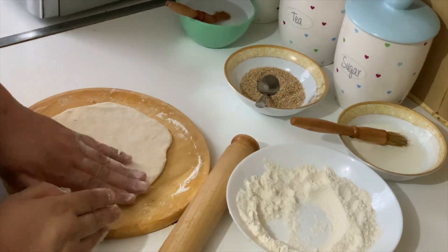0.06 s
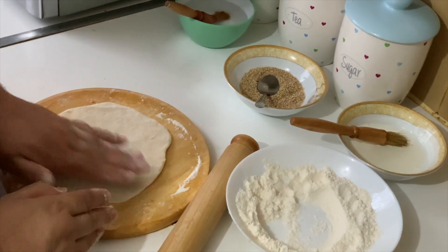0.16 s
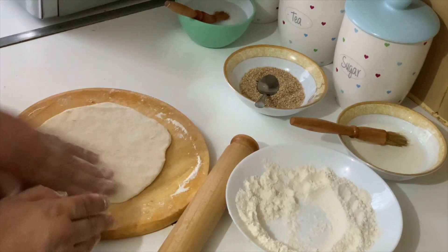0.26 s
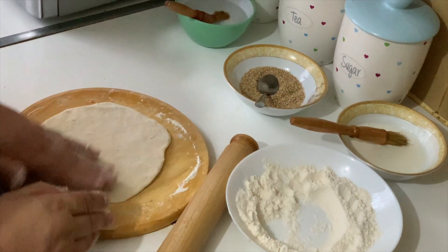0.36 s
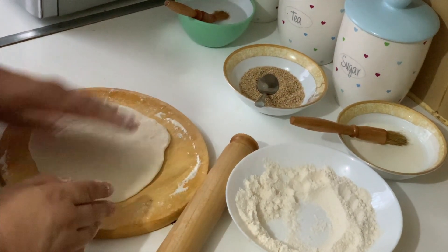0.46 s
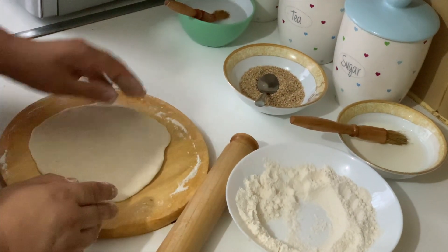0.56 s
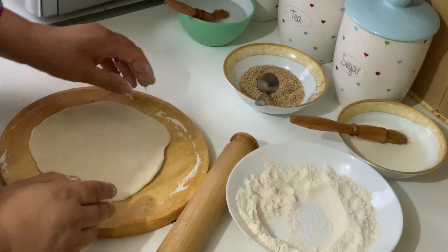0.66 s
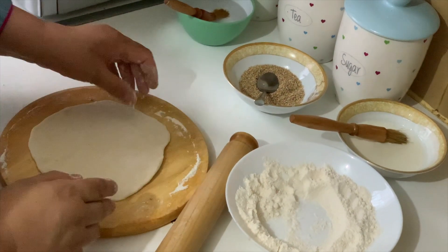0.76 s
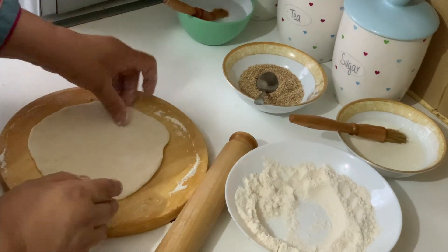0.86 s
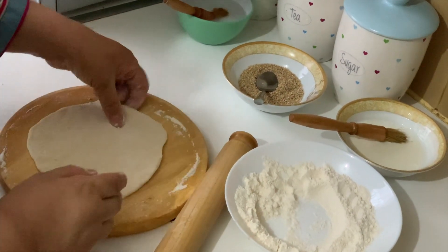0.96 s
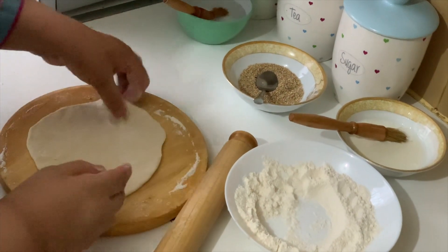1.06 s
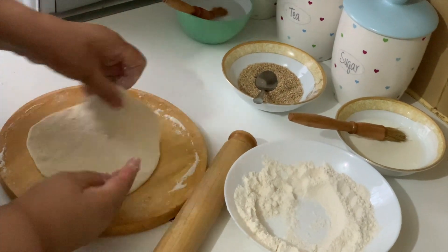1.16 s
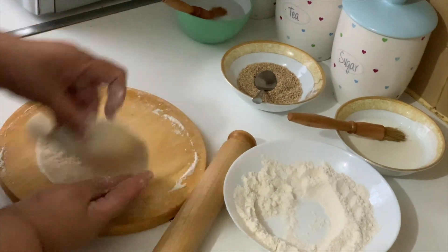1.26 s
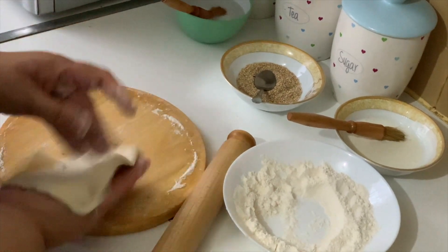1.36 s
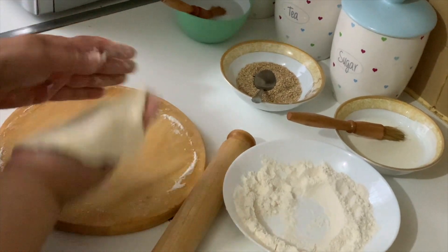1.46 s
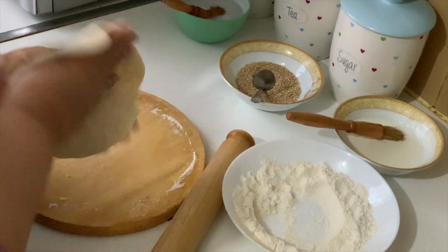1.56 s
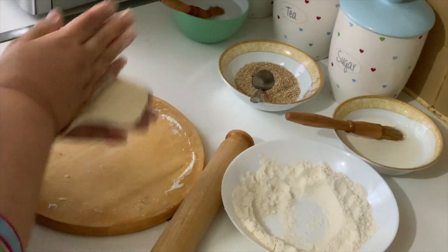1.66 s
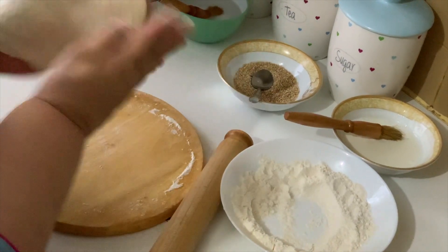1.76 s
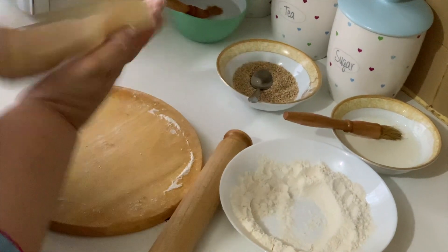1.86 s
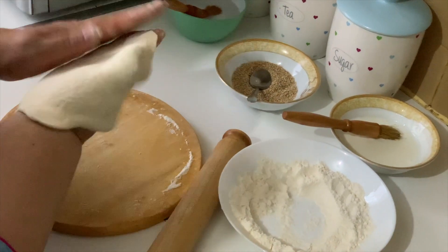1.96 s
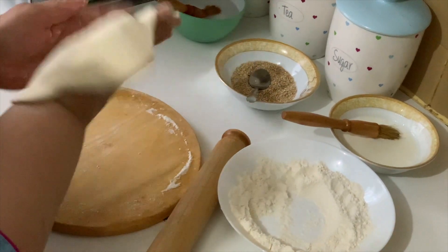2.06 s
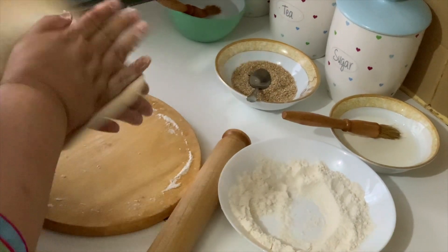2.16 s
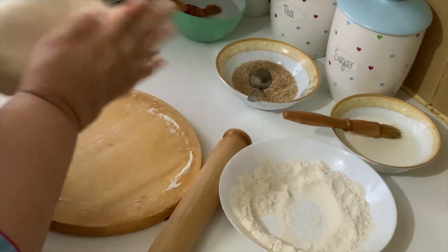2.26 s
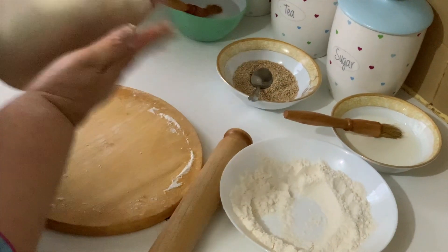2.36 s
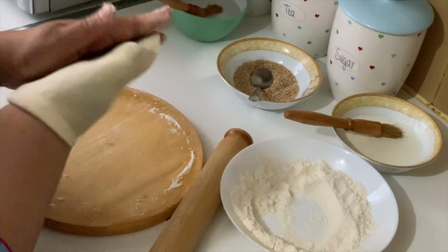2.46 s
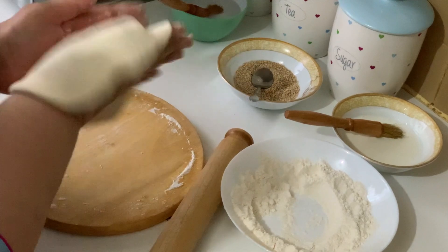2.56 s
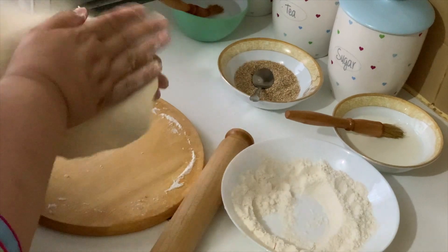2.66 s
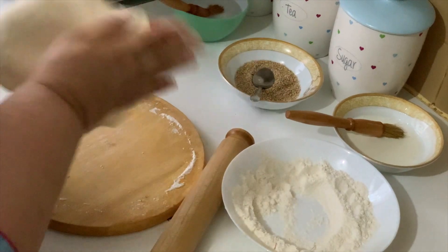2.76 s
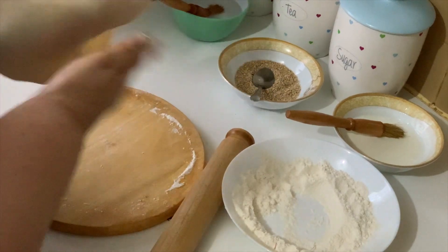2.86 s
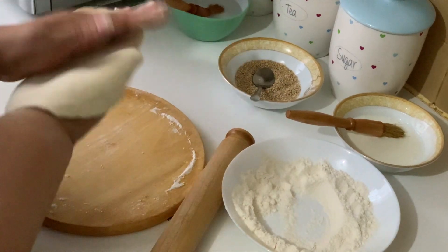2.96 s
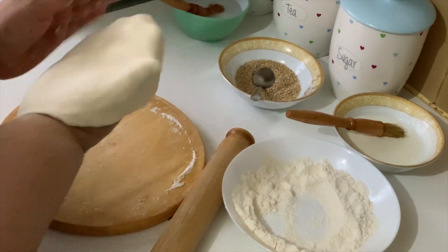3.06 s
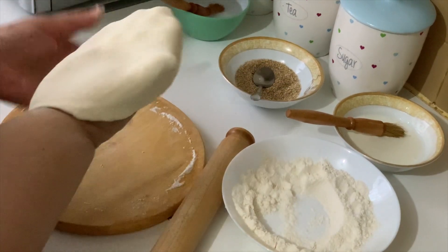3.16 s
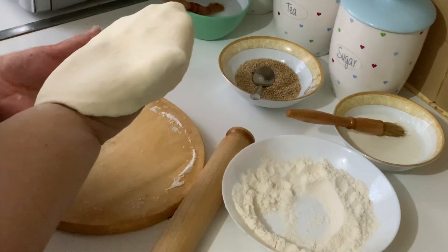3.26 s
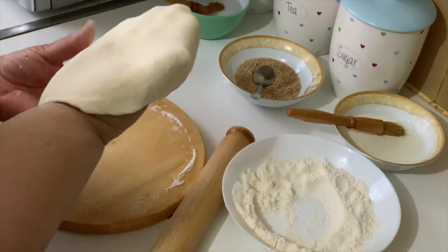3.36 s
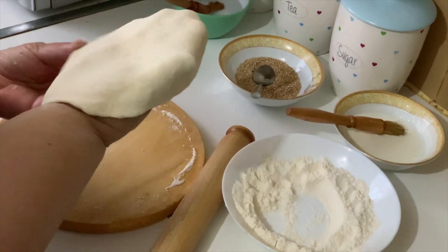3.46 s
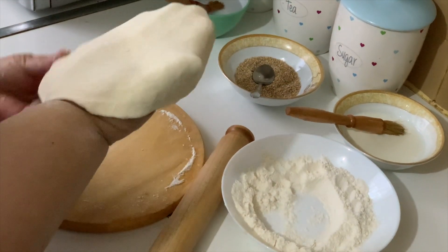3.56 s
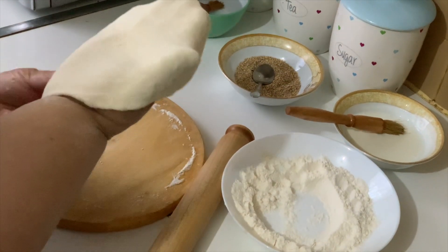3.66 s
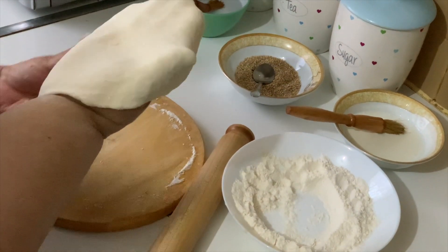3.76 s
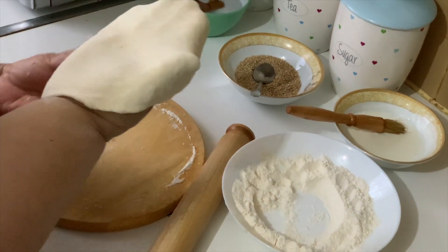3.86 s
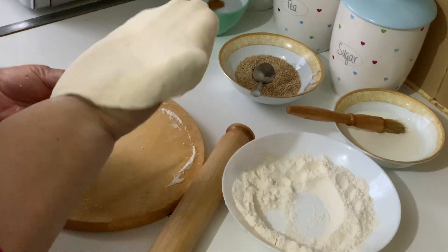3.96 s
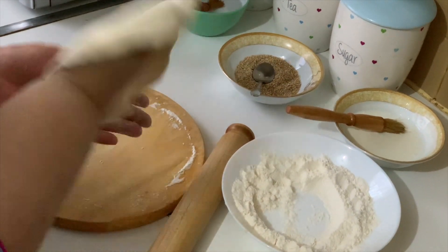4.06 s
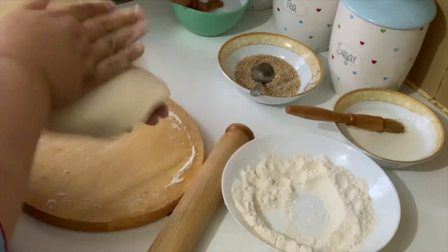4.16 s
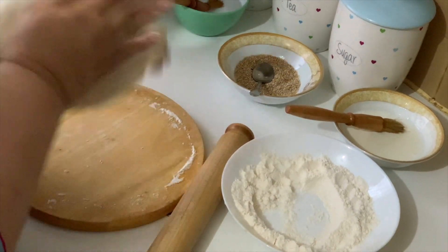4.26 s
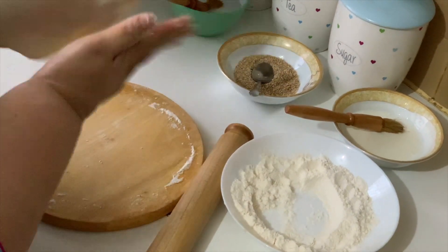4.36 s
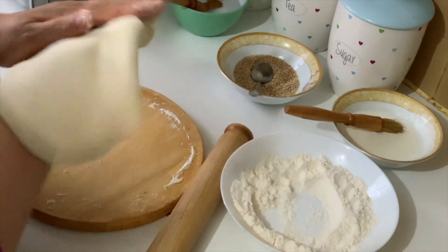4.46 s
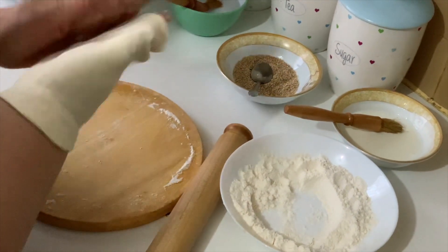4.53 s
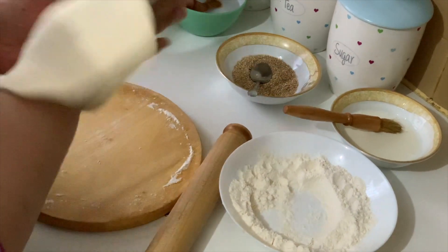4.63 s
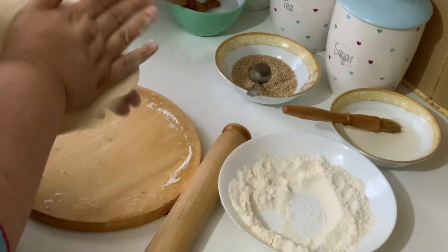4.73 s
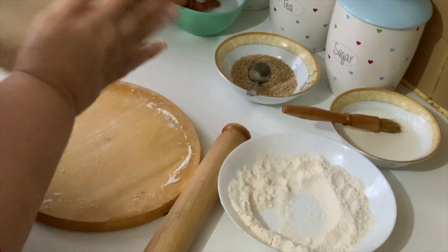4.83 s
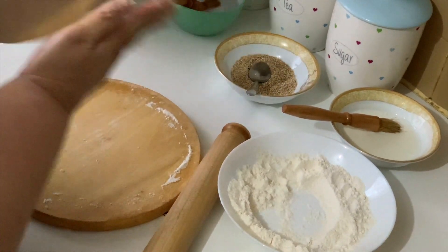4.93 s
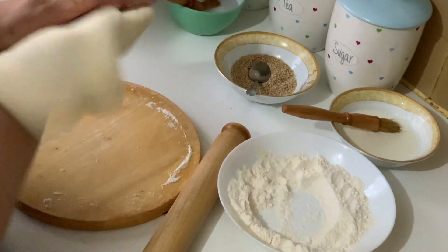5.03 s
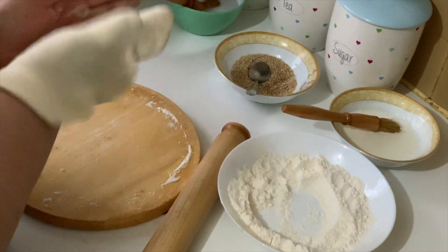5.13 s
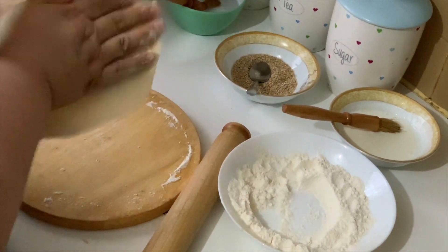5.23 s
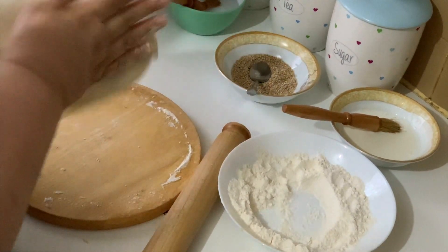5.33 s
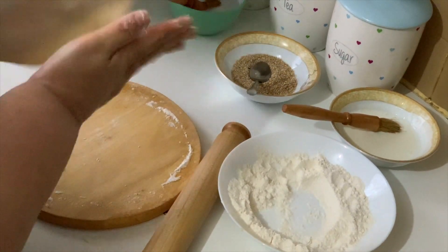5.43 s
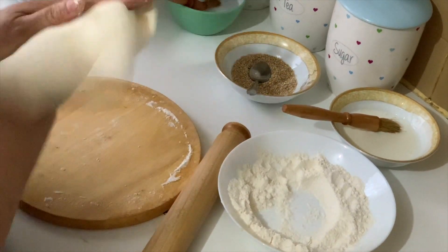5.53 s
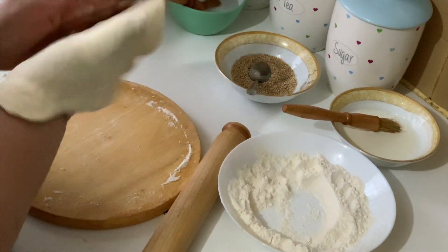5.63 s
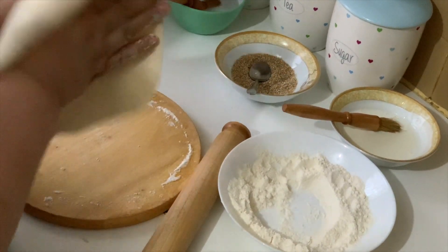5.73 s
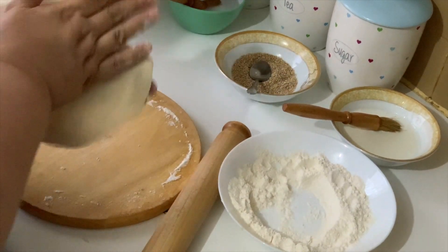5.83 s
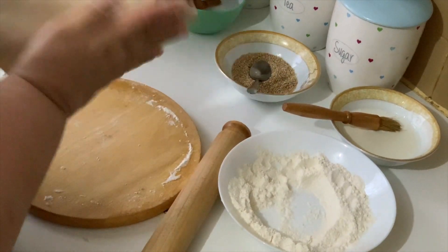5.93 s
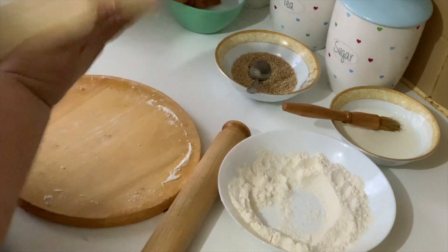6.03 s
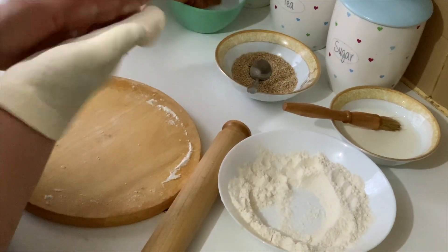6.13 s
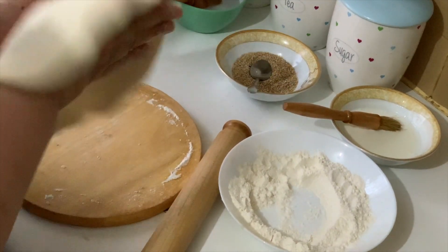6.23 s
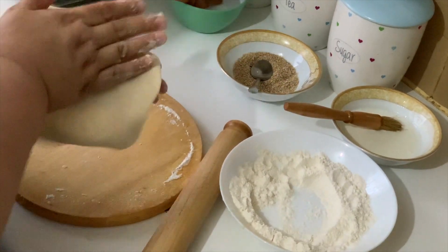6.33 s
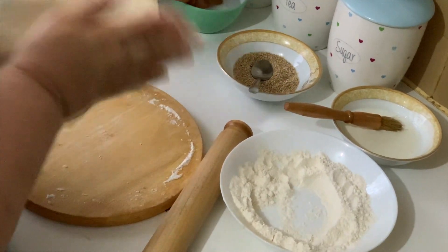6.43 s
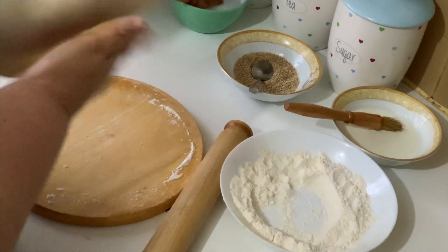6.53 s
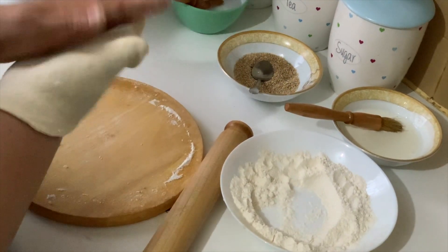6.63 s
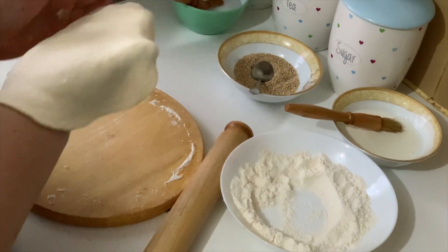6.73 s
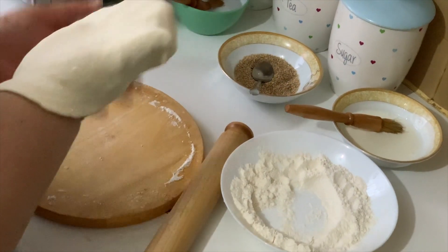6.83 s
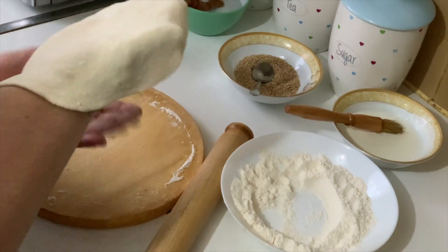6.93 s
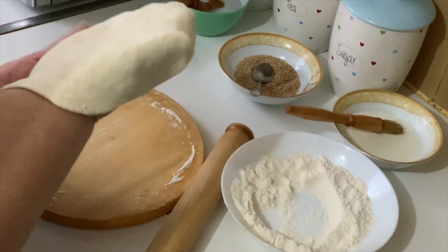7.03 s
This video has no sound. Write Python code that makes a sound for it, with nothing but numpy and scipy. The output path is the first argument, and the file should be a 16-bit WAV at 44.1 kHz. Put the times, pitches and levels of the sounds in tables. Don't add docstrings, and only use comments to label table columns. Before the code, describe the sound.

Hands work soft dough near a phone microphone on a shaky stand. A low pat and small board rattles open, then a soft catch leads into a run of wet, fleshy slaps. After a quiet gap of faint rubbing and trembling, a second, longer and stronger run pops and smacks at an even quick pace, ending in low counter bumps and quiet room tone.

```python
import sys
import numpy as np
from scipy import signal
from scipy.fft import rfft, irfft, next_fast_len
from scipy.io import wavfile
from scipy.ndimage import uniform_filter1d, map_coordinates

SR = 44100
rng = np.random.default_rng(int(sys.argv[2]) if len(sys.argv) > 2 else 0)


def generate_wav(signal):
    frames = np.transpose(np.atleast_2d(signal))
    scaled = np.clip(frames, -1, 1) * 32767
    pcm = np.round(scaled).astype(np.int16)
    wavfile.write(sys.argv[1], SR, pcm)


def gain_from_db(level_db):
    decades = np.asarray(level_db, float) / 20
    return 10 ** decades


N = 312669

# start_s, peak_db, pocket_hz, thud_db, smack_db
CUPPED_SLAPS = [
    (1.614, -24, 1290, -8.5, -7),
    (2.156, -8, 703, -19.5, -10),
    (2.403, -15.5, 538, 2, -2),
    (4.167, -13, 1155, -30, -10.5),
    (4.431, -7, 2180, -14, -6),
    (4.724, -13.5, 946, -10, -0.5),
    (4.998, -11, 1034, -16.5, -7),
    (5.243, -10, 590, -23, -9),
    (5.518, -6, 2204, -14, -4),
    (6.046, -1, 372, -32, -9.5),
]
# start_s, peak_db, hollow_hz, thud_db, smack_db
FLAT_SLAPS = [
    (1.882, -17, 1530, -16, -0.5),
    (2.649, -6, 890, -10.5, -11.5),
    (2.911, -15.5, 1770, -7, -5),
    (5.785, -1, 640, -20.5, -10.5),
    (6.299, -9.5, 1360, -15, -5),
    (6.573, -11.5, 455, -14, -6),
]
# start_s, peak_db, hollow_hz, thud_db, smack_db
DULL_PATS = [
    (0.284, -16, 820, 4.5, -23),
    (0.836, -41.5, 1020, 4, -40),
    (0.915, -43, 780, 9.5, 1.5),
    (6.763, -50.5, 1050, 15.5, -36),
]
# start_s, peak_db, pocket_hz, smack_db
EDGE_FLAPS = [
    (2.945, -29, 2570, -15),
    (4.552, -25.5, 1890, -2),
    (5.363, -25.5, 1800, 3),
]
# start_s, peak_db, pocket_hz, smack_db
FINGER_TAPS = [(1.688, -39, 1920, -7), (2.153, -18.5, 4380, -3.5), (2.169, -22.5, 374, -35),
               (2.401, -4.5, 1660, -17.5), (2.652, -25, 1890, -18), (4.558, -40.5, 1600, 9),
               (5.002, -20, 2150, -27), (5.777, -17, 1000, 3.5), (5.788, -19.5, 1040, -9),
               (6.049, -19, 1640, 0), (6.577, -19.5, 1580, -9.5)]
# start_s, level_db, pitch_hz
HEEL_PUSHES = [
    (2.1605, -2, 600),
    (2.4077, -7.5, 500),
    (2.655, -16.5, 330),
    (5.79, -17, 430),
    (6.05, -5.5, 470),
    (6.3109, -19.5, 230),
]
# freq_hz, level_db (per Hz)
PALM_COLOUR = [(180, -4.5), (300, -1.5), (579, 2), (892, -3.5), (1030, 1.5), (1810, -0.5), (1990, 2.5),
               (3500, -29.5), (4550, -102), (7700, -120)]
# freq_hz, level_db (per Hz)
SKIN_COLOUR = [(1500, -24), (2500, 4), (4300, -1.5), (5700, -7.5), (9700, -7.5), (12500, -13.5),
               (15200, -21.5), (15800, -71), (17000, -120)]
# freq_hz, level_db (per Hz)
THUD_COLOUR = [(24, -17), (40, 3), (200, 16), (450, -3), (580, -81.5), (990, -120)]
# start_s, level_db
DOUGH_PEELS = [
    (1.339, -44.5),
    (1.91, -33),
    (4.834, -44.5),
    (5.875, -41),
]
# start_s, level_db
BOARD_KNOCKS = [
    (0.283, -19.5),
    (0.844, -43),
    (.92, -45),
]
# pitch_hz, level_db, t60_s
BOARD_MODES = [(56.7, 1.5, 0.51), (110.4, 1, 0.41), (167.5, 9.5, 0.13), (251.6, -11.5, 0.44),
               (301, -33, 1.3)]
# start_s, level_db, pitch_hz, ring_cycles
COUNTER_JOLTS = [(0.032, -29.5, 59, 3.9), (0.477, -29, 72.5, 1.9), (1.623, -32.5, 62, 4.6),
                 (4.78, -12, 100, 0.38), (4.808, -21, 95, 0.74), (4.859, -31, 402, 3),
                 (4.885, -26.5, 340, 3.2), (4.9, -33, 60, 1.7), (4.93, -33, 430, 3), (5.017, -25, 77, 1.1),
                 (5.522, -23, 77.6, 1.2), (6.602, -21, 98.5, 2.3), (6.619, -19, 111, 2.7),
                 (6.655, -37, 85, 1.5), (6.701, -16.5, 72.6, 0.58), (6.72, -11, 53, 0.52),
                 (6.766, -16.5, 99.4, 1.6), (6.813, -17, 84, 0.79)]
# start_s, level_db, pitch_hz, bounce_count
BOARD_RATTLES = [
    (.584, -24, 855, 2),
    (1.988, -28.5, 340, 3),
    (2.058, -29.5, 288, 3),
]
# peak_s, length_s, level_db
STAND_SHAKES = [(.04, 0.1, -34), (.41, 0.18, -39), (.6, 0.27, -43.5), (1.0, 0.68, -50), (1.27, 0.074, -46),
                (1.42, 0.31, -41), (1.66, .12, -40), (1.85, .2, -36), (2.01, 0.13, -38), (3.2, 0.19, -39.5),
                (3.3, 0.16, -39.5), (3.6, 0.29, -39.5), (3.86, .07, -42), (3.95, .1, -44),
                (4.8, 0.13, -21.5), (4.88, 0.35, -27), (5.0, 0.11, -25), (5.1, 0.041, -35),
                (5.35, 0.039, -30), (5.45, 0.069, -47), (6.62, 0.1, -20.5), (6.82, 0.13, -30)]
# freq_hz, level_db (per Hz)
SHAKE_COLOUR = [(12, -42), (20, -69), (48, 8), (103, -2.5), (258, -16), (362, -24), (392, -9), (500, -29),
                (650, -61), (1100, -120)]
# peak_s, length_s, level_db, hiss_db
RUB_STROKES = [(.08, 0.21, -63, -3.5), (.28, 0.067, -54, -4), (.525, 0.046, -48, -32),
               (.6, 0.16, -35.5, -10.5), (.72, 0.34, -50, -25), (.92, 0.16, -58, -1.5),
               (1.02, 0.75, -61, -5), (1.19, 0.39, -62, -5), (1.34, 0.16, -49.5, -3),
               (1.45, 0.21, -57, -4.5), (1.7, 0.088, -52.5, 4), (1.81, 0.082, -61, 1),
               (1.88, 0.025, -42, -5), (2.02, 0.06, -63, -16), (2.95, 0.048, -35, -24),
               (3.01, 0.067, -50, -1), (4.8, 0.33, -43.5, -5.5), (5.08, 0.14, -52.5, 3),
               (5.6, 0.14, -49.5, -1.5), (3.31, 0.34, -57.5, -25), (3.45, .05, -70, -11),
               (3.6, 0.32, -58, -5), (3.99, 0.11, -66, 8), (4.165, 0.041, -40.5, -10.5),
               (6.72, 0.065, -56.5, 8), (6.86, 0.5, -56.5, -20)]
# freq_hz, level_db (per Hz)
FLOUR_COLOUR = [(410, -44), (700, -3.5), (823, -7), (1150, -4.5), (1280, -34), (1390, -5), (3110, -9.5),
                (4660, -9), (6000, -31), (7800, -34), (13200, -120)]
# freq_hz, level_db (per Hz)
CLOTH_COLOUR = [(3240, -38), (5500, -3.5), (9810, -3.5), (11700, -32), (12400, -6.5), (14400, -12),
                (15900, -11)]
# start_s, level_db
NAIL_TICKS = [
    (.513, -38),
    (.5705, -25),
    (.5775, -23),
    (3.45, -50),
]
# freq_hz, level_db (per Hz)
HUM_COLOUR = [(15, -36), (25, -78), (59, -6.5), (235, 1.5), (559, -5.5), (1160, -0.5), (3150, -34.5),
              (4600, -34), (7680, -33.5), (9800, -34.5), (11500, -24), (12800, -33.5), (14300, -38),
              (15900, -38)]
# freq_hz, left_right_likeness (0 to 1)
PORT_LIKENESS = [(60, 0.85), (150, 0.8), (380, 0.49), (950, 0.0034), (2380, 0.031), (5980, 0.057),
                 (15000, 0.3)]
# freq_hz, t60_s
KITCHEN_DECAY = [(100, 0.27), (300, 0.2), (800, 0.27), (2000, 0.22), (5000, 0.3), (9000, 0.16),
                 (14000, 0.24)]

POCKET_DB_PER_OCTAVE = 12
CUPPED_POP_DB, PAT_POP_DB, FLAP_POP_DB = -1.1, 4.5, 10.5
FLAT_POP_DB, TAP_POP_DB, LIGHT_THUD_DB = -17, 3.5, -29
LEAD_IN_S = 0.02
HEEL_CYCLES = 0.8
PEEL_HZ, PEEL_WIDTH_HZ, PEEL_T60_S = 9200, 1500, 0.058
BOUNCE_S, BOUNCE_CYCLES, BOUNCE_LOSS_DB = 0.019, 1.4, 0.5
SHAKE_RISE, STILL_DB = 0.37, -58
SLAP_SHAKE_DB, SLAP_SHAKE_S = -37, 0.29
STROKE_RISE = 0.52
TOSS_DB, TOSS_HISS_DB, TOSS_S = -53.5, -6.5, 0.29
HUM_DB = -49


def unit(x):
    return x / np.sqrt(np.mean(x ** 2) + 1e-20)


def along(points, hz):
    f, v = np.transpose(points)
    return np.interp(np.log(hz + 1), np.log(f + 1), v)


def wobble(rate):
    knots = rng.standard_normal(int(N * rate / SR) + 4)
    return map_coordinates(knots, [np.arange(N) * rate / SR])


def swells(rows, rise):
    peak, length, db = np.transpose(rows)[:3, :, None]
    late = (np.arange(0, N + 64, 64) / SR - peak) / length
    slope = np.where(late < 0, -late / rise, late / (1 - rise))
    gain = gain_from_db(db - 19.8 * slope ** 1.14)
    return np.repeat(gain, 64, axis=1)[:, :N]


def filtered(x, response):
    size = x.shape[-1]
    m = next_fast_len(size + 2048)
    return irfft(rfft(x, m) * response(np.fft.rfftfreq(m, 1 / SR)), m)[..., :size]


def noise(size, colour):
    return unit(filtered(rng.standard_normal(size), lambda hz: gain_from_db(along(colour, hz))))


def diffuse(pair):
    turn = lambda hz: np.arccos(np.clip(along(PORT_LIKENESS, hz), -1, 1)) / 2
    mid, side = filtered(pair, lambda hz: np.array([np.cos(turn(hz)), np.sin(turn(hz))]))
    return np.array([mid + side, mid - side])


def heard(near, far, wet_db, lead_s):
    hz, t, grains = signal.stft(rng.standard_normal((2, len(far))), SR, nperseg=256)
    kitchen = gain_from_db(-60 * t / along(KITCHEN_DECAY, hz)[:, None])
    next_room = gain_from_db(-13.5 - 60 * t / 0.53)
    patches = uniform_filter1d(rng.standard_normal(grains.shape[1:]), size=4, axis=0)
    patches = gain_from_db(1.3 * unit(uniform_filter1d(patches, size=8, axis=1)))
    tail = signal.istft(grains * (kitchen + next_room) * patches, SR, nperseg=256)[1][:, :len(far)]
    tail = diffuse(tail * np.clip(np.arange(len(far)) / SR / 0.001, 0, 1))
    wet = signal.fftconvolve(far[None], tail / np.linalg.norm(tail[0]), axes=1)[:, :len(far)]
    delay = np.array([[0], [lead_s]])
    lag = lambda f: np.exp(-2j * np.pi * f * delay / (1 + (f / 6000) ** 4))
    return filtered(np.array([near, near]), lag) + gain_from_db(wet_db) * wet


def contacts():
    pop = lambda hz, db: db + POCKET_DB_PER_OCTAVE * np.log2(hz / 1000)
    landings = [(s, db, hz, pop(hz, CUPPED_POP_DB), thud, skin) for s, db, hz, thud, skin in CUPPED_SLAPS]
    landings += [(s, db, hz, pop(hz, PAT_POP_DB), thud, skin) for s, db, hz, thud, skin in DULL_PATS]
    landings += [(s, db, hz, FLAT_POP_DB, thud, skin) for s, db, hz, thud, skin in FLAT_SLAPS]
    landings += [(s, db, hz, pop(hz, FLAP_POP_DB), LIGHT_THUD_DB, skin) for s, db, hz, skin in EDGE_FLAPS]
    landings += [(s, db, hz, TAP_POP_DB, LIGHT_THUD_DB, skin) for s, db, hz, skin in FINGER_TAPS]
    return sorted(landings)


def slaps():
    out, size = np.zeros((2, N + SR)), SR // 2
    t = np.arange(size) / SR - LEAD_IN_S
    after = np.maximum(t, 0)
    instant = 1. * (np.arange(size) == 900)
    skin = unit(filtered(instant, lambda hz: gain_from_db(along(SKIN_COLOUR, hz)))) / np.sqrt(size)
    for s, db, pocket_hz, pop_db, thud_db, skin_db in contacts():
        cupped = lambda hz: gain_from_db(along(PALM_COLOUR, hz) - 2.17 * np.abs(np.log2((hz + 1) / pocket_hz)))
        fingers = gain_from_db(-14.5) * np.exp(np.minimum(t, 0) / 0.0038)
        blow = (fingers + (1 - np.exp(-after / 0.005))) * gain_from_db(-60 * after / 0.031)
        blow *= gain_from_db(4.4 * unit(uniform_filter1d(rng.standard_normal(size), size=60)))
        crack = blow * gain_from_db(-60 * after / 0.044) * gain_from_db(skin_db + 4.5) * noise(size, SKIN_COLOUR)
        smack = blow * unit(filtered(rng.standard_normal(size), cupped)) + crack
        palm = unit(filtered(instant, cupped)) / np.sqrt(size)
        spread = np.linalg.norm(blow) * palm + np.linalg.norm(crack) * skin
        turns = after * pocket_hz
        swing = gain_from_db(pop_db + 7.5) * turns * (1 - np.exp(-after / 0.0013)) * np.sin(2 * np.pi * turns)
        thud = gain_from_db(thud_db) * np.clip(t / 0.0026, 0, 1) * gain_from_db(-60 * after / 0.085)
        thud *= noise(size, THUD_COLOUR)
        near = smack + swing * np.exp(-turns / 1.4) + thud
        far = 0.97 * spread + 0.61 * smack + 6.5 * swing * np.exp(-turns / 0.5) + gain_from_db(-6) * thud
        wet_db = -0.2 * max(thud_db - 5, 0) + 0.02
        slap = gain_from_db(db + 1) * heard(near, far, wet_db, lead_s=0.00024)
        out[:, round((s - LEAD_IN_S) * SR):][:, :size] += slap
    return out[:, :N]


def heel():
    out, t = np.zeros(N), np.arange(-512, 512) / SR
    for s, db, hz in HEEL_PUSHES:
        push = np.exp(-(t * hz / HEEL_CYCLES) ** 2) * np.cos(2 * np.pi * hz * t)
        out[round(s * SR) - 512:][:len(t)] -= gain_from_db(db) * push
    return out


def peel():
    out, t = np.zeros((2, N + SR)), np.arange(SR // 10) / SR
    band = lambda hz: np.exp(-((hz - PEEL_HZ) / PEEL_WIDTH_HZ) ** 2)
    for s, db in DOUGH_PEELS:
        spit = unit(filtered(rng.standard_normal(len(t)), band))
        out[:, round(s * SR):][:, :len(t)] += gain_from_db(db - 60 * t / PEEL_T60_S) * spit
    return out[:, :N]


def board():
    out, t = np.zeros(N + SR), np.arange(SR // 2) / SR
    for s, db in BOARD_KNOCKS:
        ring = sum(gain_from_db(level - 60 * t / t60) * np.sin(2 * np.pi * hz * t) for hz, level, t60 in BOARD_MODES)
        out[round(s * SR):][:len(t)] += gain_from_db(db) * ring * (1 - np.exp(-t / 0.0038))
    return out[:N] * gain_from_db([[-1.5], [1.5]])


def bounces():
    rows = []
    for s, db, hz, count in BOARD_RATTLES:
        for k in range(round(count)):
            detune = 1 + 0.046 * np.sign(k) * rng.standard_normal()
            rows.append((s + k * BOUNCE_S, db - k * BOUNCE_LOSS_DB, hz * detune, BOUNCE_CYCLES))
    return rows


def counter():
    jolts, t = np.zeros(N + SR), np.arange(SR // 4) / SR
    for s, db, hz, cycles in COUNTER_JOLTS + bounces():
        onset = 1 - np.exp(-t * hz / 0.092)
        ring = onset * np.exp(-t * hz / cycles) * np.sin(2 * np.pi * hz * t)
        jolts[round(s * SR):][:len(t)] += gain_from_db(db - 0.5) * ring
    sway = noise(N, SHAKE_COLOUR)
    sway /= np.sqrt(np.abs(uniform_filter1d(sway ** 2, size=2600)) + 0.16)
    rows = STAND_SHAKES + [(s + 0.036, SLAP_SHAKE_S, SLAP_SHAKE_DB + 0.4 * db)
                           for s, db, *_ in CUPPED_SLAPS + FLAT_SLAPS]
    shake = gain_from_db(STILL_DB) + swells(rows, SHAKE_RISE).sum(0)
    tremble = gain_from_db(-5.5) * shake * (sway + 0.18 * noise((2, N), SHAKE_COLOUR))
    return jolts[:N] * gain_from_db([[-.8], [.8]]) + tremble


def rubbing():
    rows = RUB_STROKES + [(s, TOSS_S, TOSS_DB, TOSS_HISS_DB) for s, *_ in CUPPED_SLAPS + FLAT_SLAPS]
    strokes = swells(rows, STROKE_RISE)
    grit = unit(gain_from_db(1.3 * wobble(26) + 2.2 * wobble(400)))
    scrape = strokes.sum(0) * unit(diffuse(noise((2, N), FLOUR_COLOUR)))
    hiss_gain = gain_from_db([row[3] for row in rows]) @ strokes
    hiss = hiss_gain * unit(diffuse(noise((2, N), CLOTH_COLOUR)))
    nail = np.zeros(N)
    for s, db in NAIL_TICKS:
        nail[round(s * SR)] = gain_from_db(db + 17)
    dull = lambda hz: gain_from_db(along(SKIN_COLOUR, hz)) / (1 + (hz / 6500) ** 4)
    return gain_from_db(2.5) * grit * (scrape + hiss) + filtered(nail, dull)


def hum():
    return gain_from_db(HUM_DB + 2 + 0.13 * wobble(4.9)) * unit(diffuse(noise((2, N), HUM_COLOUR)))


def scene():
    return slaps() + heel() + peel() + board() + counter() + rubbing() + hum()


def low_pass(x):
    return signal.sosfilt(signal.butter(12, 16080, fs=SR, output="sos"), x)


def record(dry):
    x = filtered(dry, lambda hz: 1 / np.sqrt(1 + (42 / (hz + 1)) ** 6))
    x = x / (1 + np.abs(x) ** 6) ** (1 / 6)
    notch = lambda hz: gain_from_db(-32 * np.exp(-((hz - 11550) / 750) ** 4))
    mix = filtered(x, lambda hz: notch(hz) / (1 + (hz / 15700) ** 40))
    return low_pass(mix)


dry = scene()
out = record(dry)
generate_wav(out)
```